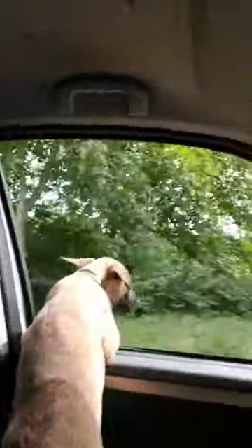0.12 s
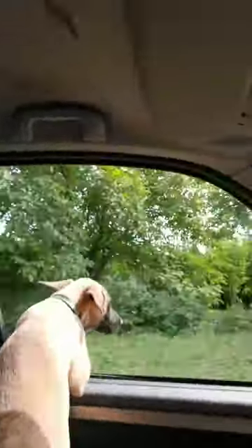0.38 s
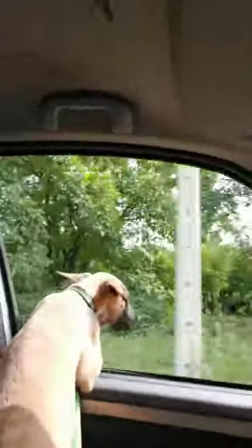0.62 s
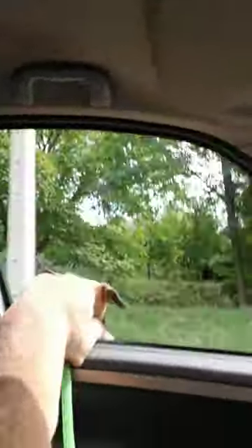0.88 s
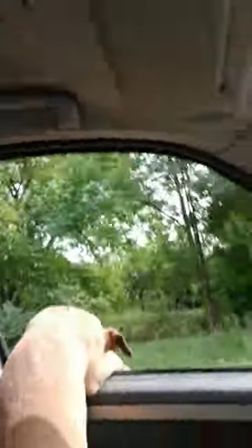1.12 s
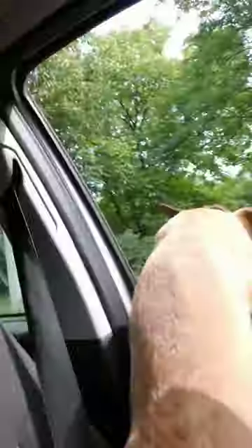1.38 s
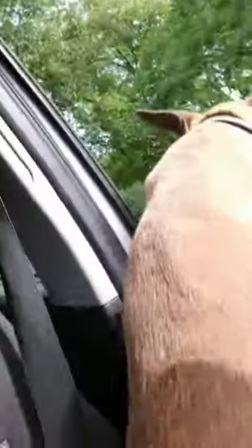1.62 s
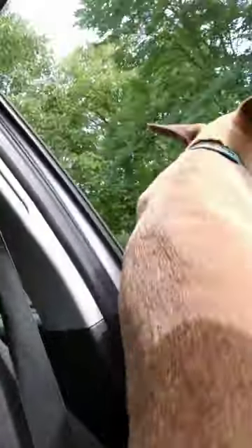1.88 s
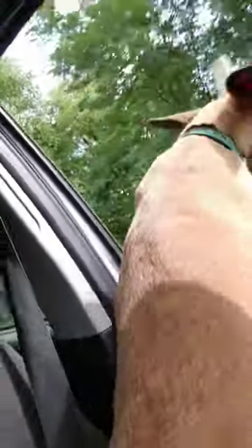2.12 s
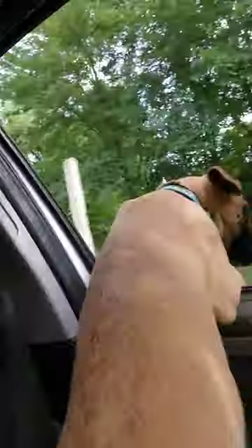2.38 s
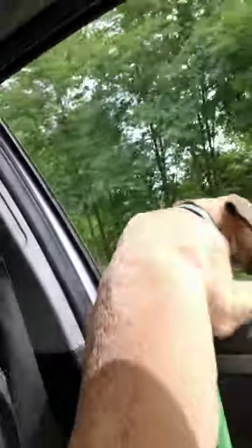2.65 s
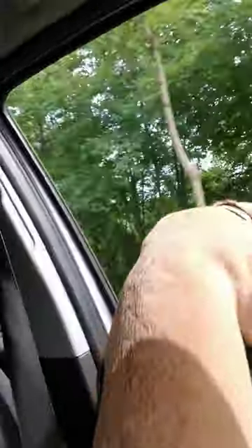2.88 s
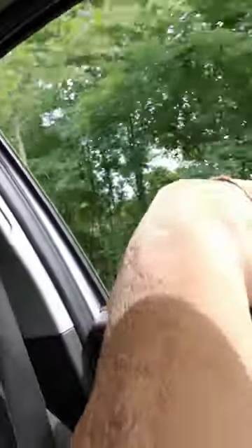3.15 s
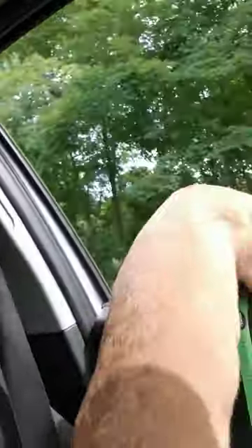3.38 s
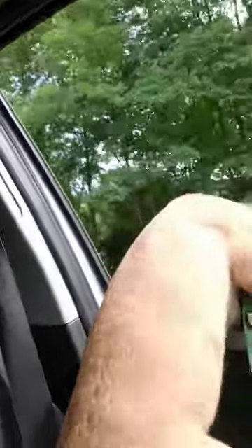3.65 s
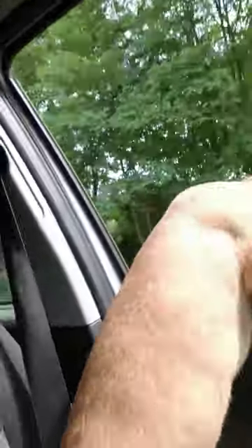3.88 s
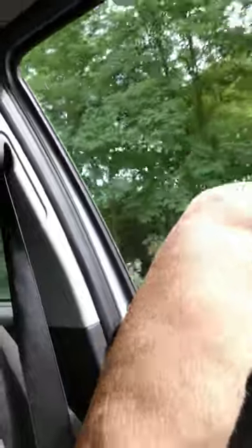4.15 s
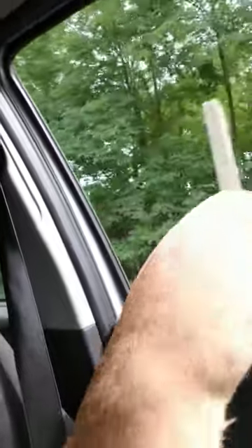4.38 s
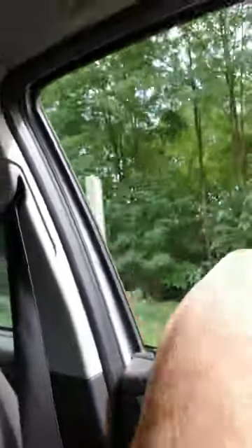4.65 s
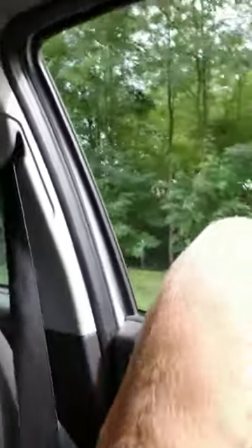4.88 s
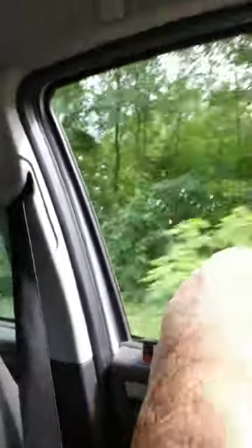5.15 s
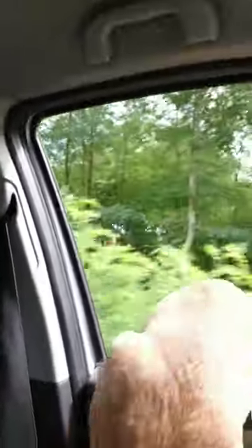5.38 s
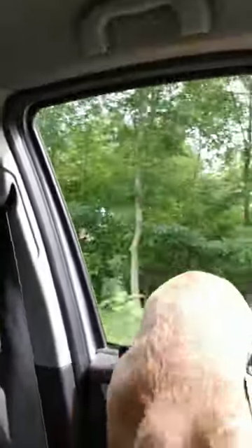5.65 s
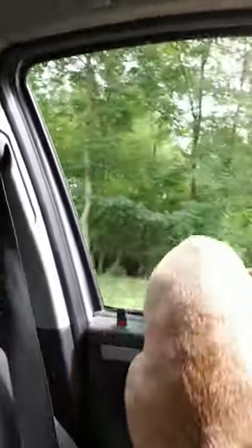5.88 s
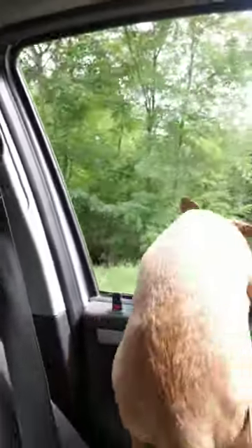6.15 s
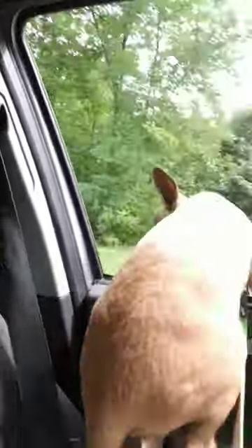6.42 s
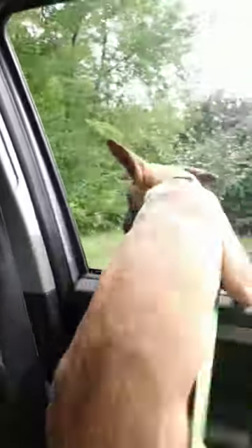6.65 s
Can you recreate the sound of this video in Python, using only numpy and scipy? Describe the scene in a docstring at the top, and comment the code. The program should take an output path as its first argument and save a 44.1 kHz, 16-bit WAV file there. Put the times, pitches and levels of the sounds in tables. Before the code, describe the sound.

A handheld microphone in a car cabin picks up continuous low rumble, uneven and shuddering, with faint window wind. The start is fairly plain, with small ticks and a soft rub; from about two seconds bumps cluster, and paws knock and scratch on plastic. A burst of coarse fur or cloth rubbing follows, then scattered clicks, a brief passing tyre swish and final knocks.

```python
"""Car on a rough road, window open

Inside a car on a rough country road with a side window open and a dog leaning out.
Resonant noise booms in the cabin, bumps heave and shudder; tyre roar and airflow come from the window.
To the right fur and cloth rub and shaken trim rattles dully, both as fluttering noise; paws, claws and
loose trim excite resonances as ticks and knocks. Two squeaks slide in pitch; late on, a vehicle swells past."""
import sys
import numpy as np
from scipy import signal
from scipy.fft import rfft, irfft, next_fast_len
from scipy.io import wavfile
from scipy.ndimage import uniform_filter1d, map_coordinates

SR = 44100
rng = np.random.default_rng(int(sys.argv[2]) if len(sys.argv) > 2 else 0)


def ratio(d):
    """dB to gain"""
    e = np.asarray(d, float) / 20
    return 10 ** e


def materialize(psi):
    """Save the field psi as 16-bit PCM at rate SR to the path in sys.argv[1].

    A 1-D psi becomes a single channel; in a 2-D psi each row is a channel.
    """
    bounded = np.clip(np.atleast_2d(psi).T, -1, 1)
    quanta = np.round(bounded * 32767).astype(np.int16)
    wavfile.write(sys.argv[1], SR, quanta)


N = 298998


def unit(x):
    """Scale to rms 1."""
    return x / np.sqrt(np.mean(x ** 2) + 1e-20)


def along(points, hz):
    """Interpolate (Hz, value) points on a log frequency axis."""
    f, v = np.transpose(points)
    return np.interp(np.log(hz + 1), np.log(f + 1), v)


def curves(rows):
    """One value per sample for each column after the time."""
    s, *cols = np.transpose(rows)
    return [np.interp(np.arange(N) / SR, s, c) for c in cols]


def wobble(knots_per_s):
    """Smooth random curve through random knots."""
    knots = rng.standard_normal(int(N * knots_per_s / SR) + 4)
    return map_coordinates(knots, [np.arange(N) * knots_per_s / SR])


def filtered(x, response):
    """Multiply the spectrum of x by a complex response of frequency."""
    m = next_fast_len(x.shape[-1] + 8192)
    spectrum = rfft(x, m) * response(np.fft.rfftfreq(m, 1 / SR))
    return irfft(spectrum, m)[..., :x.shape[-1]]


def resonances(modes):
    """Causal response of (Hz, width Hz, dB) resonances of alternating sign."""
    def response(f):
        return sum((-1) ** k * ratio(db) * 1j * f * w / (c * c - f * f + 1j * f * w)
                   for k, (c, w, db) in enumerate(modes))
    return response


def shape(spectrum):
    """Gain of a (Hz, dB) spectrum."""
    return lambda hz: ratio(along(spectrum, hz))


# sound shared by both microphones: (frequency [Hz], likeness [0..1])
LIKENESS = [(30, .998), (60, 0.99), (130, 0.99), (290, 0.82), (640, 0.84), (1400, 0.1), (4000, .35),
            (12000, .2)]


def ports(pair, balance, lead_s):
    """Two noises become two microphones: partly shared, tilted to one side, the left early by lead_s."""
    def share(hz):
        turn = np.arccos(np.clip(along(LIKENESS, hz), -1, 1)) / 2
        return np.array([np.cos(turn), np.sin(turn)])

    def tilt(hz):
        # below a few hundred Hz the cabin moves as one and the delay fades
        lag = np.pi * hz * lead_s * hz ** 2 / (hz ** 2 + 500 ** 2)
        gain = ratio(np.outer([0.5, -0.5], along(balance, hz)))
        return gain * np.exp(1j * np.outer([1, -1], lag))

    mid, side = filtered(pair, share)
    return filtered(np.array([mid + side, mid - side]), tilt)


def rush(colour, balance, lead_s, patchy_db):
    """Stereo noise, patchy in time and frequency, whose middle has rms 1."""
    z = signal.stft(rng.standard_normal((2, N)), nperseg=512)[2]
    field = uniform_filter1d(rng.standard_normal(z.shape[1:]), size=6, axis=0)
    field = uniform_filter1d(field, size=8, axis=1)
    pair = signal.istft(z * ratio(patchy_db * unit(field)), nperseg=512)[1][:, :N]
    out = ports(filtered(pair, colour), balance, lead_s)
    return out / np.sqrt(np.mean(out.mean(0) ** 2))


def place(events, lead_s):
    """Lay out stereo bursts (time s, pair, dB, left over right dB)."""
    out = np.zeros((2, N + SR))
    for s, pair, db, pan_db in events:
        both = ports(pair, [(100, pan_db)], lead_s)
        start = round(s * SR)
        out[:, start:start + both.shape[1]] += ratio(db) * both
    return out[:, :N]


# cabin air resonances: (centre [Hz], width [Hz], relative level [dB])
CABIN_MODES = [(23, 11.7, 0), (37.1, 17.7, 0.5), (67.5, 18.4, 0)]
# body drumming, tyre roar and airflow spectra: (frequency [Hz], relative density [dB])
DRUM_SPECTRUM = [(50, -34), (85, 0), (124, -7.5), (154, -6), (183, -15.5), (252, -19), (300, -26),
                 (390, -38.5), (660, -120)]
ROAR_SPECTRUM = [(180, -54), (300, -9), (356, -1), (397, -7), (471, -5.5), (973, -13.5), (1100, -11.5),
                 (1830, -23.5), (2300, -38), (2990, -57), (5060, -120)]
AIR_SPECTRUM = [(1180, -36.5), (2000, -21), (2980, 0), (4390, -23.5), (5050, -14), (5600, -63.5),
                (6710, -15.5), (7510, -30), (12200, -12.5), (15800, -16.5)]
# balance of sound from the window: (frequency [Hz], left over right [dB])
WINDOW_BALANCE = [(60, -1), (180, 0.5), (550, -0.5), (1650, -6), (4970, 10), (15000, 2.5)]
# road coarseness, heard as drumming: (time [s], mean level [dB])
SURFACE_LEVEL = [(0, -29), (1.0, -31), (1.5, -31), (2.2, -30.5), (2.75, -32), (3.1, -28.5), (3.85, -33.5),
                 (4.2, -29.5), (4.9, -33), (5.2, -30.5), (5.55, -33.5), (6.0, -30.5), (6.5, -27),
                 (6.78, -32)]
# tyre roar thrown back by the roadside through the window: (time [s], mean level [dB])
ROADSIDE_LEVEL = [(0, -51), (1.0, -48.5), (2.2, -53), (3.85, -51.5), (4.2, -50), (5.2, -49.5), (5.55, -53),
                  (6.78, -44.5)]


def road():
    """The road shakes the cabin air and drums the body; tyres roar and air streams past the window."""
    (drum_db,), (roar_db,) = curves(SURFACE_LEVEL), curves(ROADSIDE_LEVEL)
    boom_db, air_db = -26, -74
    modes = resonances(CABIN_MODES)
    boom = rush(lambda hz: modes(hz) / (1 + (hz / 92) ** 6), WINDOW_BALANCE, 0, patchy_db=1.0)
    shake = wobble(11)  # small unevenness reaches body and tyres together
    drum = rush(shape(DRUM_SPECTRUM), WINDOW_BALANCE, 0, patchy_db=1.5)
    roar = rush(shape(ROAR_SPECTRUM), WINDOW_BALANCE, 0.00051, patchy_db=2.14)
    air = rush(shape(AIR_SPECTRUM), WINDOW_BALANCE, 0.0006, patchy_db=1)
    drum = ratio(drum_db + 1.53 * shake) * drum
    roar = ratio(roar_db + 1.82 * shake) * roar
    return ratio(boom_db) * boom + drum + roar + ratio(air_db) * air


# body shudder spectrum: (frequency [Hz], relative density [dB])
SHUDDER_SPECTRUM = [(41, -19.5), (70, -2.5), (135, -7), (176, -5), (269, -19.5), (400, -25), (461, -21.5),
                    (669, -36), (1500, -41.5), (1950, -55), (3300, -120)]
# bumps: (time [s], length [s], heave level [dB], nominal heave pitch [Hz], shudder level [dB])
BUMP_EVENTS = [(.0, 0.07, -20.5, 34.5, -30), (1.87, 0.1266, -22.5, 60.5, -20),
               (2.044, 0.065, -22, 34, -40.5), (2.399, 0.055, -26.5, 39, -28.5),
               (2.488, 0.14, -17.5, 48.4, -23), (2.881, .11, -18.5, 44.9, -20),
               (3.029, 0.081, -32, 39.4, -31), (3.55, 0.14, -14.5, 52.9, -21.5),
               (4.011, 0.085, -25, 34, -39.5), (4.631, .1, -33.5, 49.2, -23.5),
               (5.25, 0.1767, -17.5, 39.8, -27.5), (6.238, 0.099, -29.5, 29.7, -23)]


def bumps():
    """A wheel meets a bump: the cabin air heaves at a sinking pitch while the body shudders in lumps."""
    out, t = [], np.arange(SR // 2) / SR
    for s, length_s, heave_db, heave_hz, shudder_db in BUMP_EVENTS:
        u = t / length_s
        swell = u ** 0.8 * np.exp(-(1.65 * u) ** 1.45)
        roll = u ** 1.62 * np.exp(-(1.34 * u) ** 1.76)  # the air peaks later than the metal
        noise = rng.standard_normal((3, len(t)))
        lumps = unit(uniform_filter1d(noise[2], size=600))
        pitch_hz = heave_hz * (1.4 - 0.662 * np.minimum(u, 1.4) + 0.24 * lumps)
        heave = roll * np.sin(2 * np.pi * (rng.random() + np.cumsum(pitch_hz) / SR))
        shudder = swell * ratio(2 * lumps) * filtered(noise[:2], shape(SHUDDER_SPECTRUM))
        pair = ratio(heave_db) * unit(heave) * [[1], [0]] + ratio(shudder_db) * unit(shudder)
        span = np.sqrt(t[-1] / length_s)  # levels count over the bump's length
        out.append((s, pair / span, 0, -0.7))
    return place(out, 0)


# scrape and fine fizz spectra: (frequency [Hz], relative density [dB])
SCRAPE_SPECTRUM = [(530, -18), (900, -2.5), (1070, -4.5), (1550, 4.5), (2700, -2), (3140, -0.5), (4080, 0),
                   (5730, -2.5), (8500, -19.5), (11000, -37.5), (18700, -120)]
FIZZ_SPECTRUM = [(5000, -15), (8500, -13.5), (10600, -8), (14500, -7), (15200, -6.5), (15800, -11)]
# balance of sound from the seat side: (frequency [Hz], left over right [dB])
SEAT_BALANCE = [(60, 0), (180, -1.5), (550, -17), (1650, -3), (4970, -5), (15000, -12)]
# fur and cloth strokes, and duller rattles of trim shaken by bumps:
# (time of full strength [s], hold [s], scrape level [dB], fizz over scrape [dB])
RUB_AND_RATTLE_EVENTS = [(0.916, .005, -70.5, 1), (1.049, 0.0033, -46.5, -6), (1.289, .005, -59.5, -4.5),
                         (1.436, 0.068, -63, -0.5), (1.624, .03, -54.5, -2.5), (1.737, .06, -76, 7.5),
                         (1.97, 0.065, -56.5, -12.5), (2.31, 0.08, -68, 0), (2.518, .04, -57.5, -8),
                         (2.57, 0.025, -53.5, -21), (2.943, 0.028, -54, -29), (3.598, 0.0069, -45.5, -29.5),
                         (3.654, 0.088, -53, -3.5), (3.773, 0.034, -57, -1), (3.857, 0.014, -52, 0),
                         (3.938, 0.037, -58, -9.5), (4.27, 0.054, -52, -6.5), (4.381, 0.046, -59, -4),
                         (4.51, .005, -51.5, -8), (4.653, 0.031, -38.5, 2), (4.728, 0.1, -38, 2),
                         (4.871, 0.15, -44.5, 1), (5.115, 0.065, -44, -0.5), (5.246, 0.078, -52.5, -1.5),
                         (5.352, 0.0038, -50.5, -10), (5.493, .005, -60.5, 0.5), (5.635, 0.004, -56, -11),
                         (5.837, 0.046, -54.5, -10.5), (6.124, 0.0045, -55, -20), (6.214, .005, -48.5, -16),
                         (6.393, 0.13, -56, -12.5), (6.714, 0.031, -53, -5.5)]


def rubs_and_rattles():
    """Strokes and rattles set in, hold and fade; scrape and fizz flutter together in clumps."""
    rise_db_per_s, fade_db_per_s = 389, 179  # rise of an event of -47.5 dB
    snatch = 0.53  # dB of faster rise per dB of strength: strong events start abruptly
    rest_scrape_db, rest_fizz_db = -66, -77  # faint rubbing that never stops
    s, hold_s, db, fizz_db = np.transpose(RUB_AND_RATTLE_EVENTS)[..., None]
    t = np.arange(0, N / SR, 1 / 1000)
    rise = rise_db_per_s * ratio(snatch * (db + 47.5)) * np.maximum(s - t, 0)
    fade = fade_db_per_s * np.maximum(t - s - hold_s, 0)
    level_db = db - rise - fade

    def total(rest_db, event_db):
        power = ratio(rest_db) ** 2 + np.sum(ratio(event_db) ** 2, 0)
        return np.interp(np.arange(N) / SR, t, np.sqrt(power))

    flutter_db = 0.99 * wobble(30) + 1.15 * wobble(150)
    scrape = rush(shape(SCRAPE_SPECTRUM), SEAT_BALANCE, -0.000466, patchy_db=2.5)
    fizz = rush(shape(FIZZ_SPECTRUM), SEAT_BALANCE, -0.00024, patchy_db=1.1)
    scrape = total(rest_scrape_db, level_db) * scrape
    fizz = total(rest_fizz_db, level_db + fizz_db) * fizz
    return ratio(flutter_db) * (scrape + fizz)


def contact(modes, centre_hz, spread_db_per_octave, length_s, t60_s):
    """A sharp touch, friction for length_s, then decay; modes near centre_hz ring most."""
    t = np.arange(SR // 5) / SR
    late = np.maximum(t - length_s, 0)
    fall = ratio(-60 * late / t60_s) + ratio(-15.0 - 60 * late / 0.32)  # fast decay over a weaker slow one
    struck = [(hz, w, db - spread_db_per_octave * abs(np.log2(hz / centre_hz))) for hz, w, db in modes]
    ring = resonances(struck)
    grit = ratio(4 * np.repeat(rng.standard_normal(len(t) // 60), 60))  # surfaces catch in tiny jerks
    noise = unit(grit * rng.standard_normal((2, len(t))))
    gain = np.sqrt(np.mean(filtered(noise, ring) ** 2))
    touch = 9 * np.sign(noise) * (t == 0)
    return filtered(fall * noise + touch, ring) / gain, fall


# plastic trim resonances: (centre [Hz], width [Hz], relative level [dB])
TRIM_MODES = [(2310, 690, 3.5), (3720, 990, -3), (4700, 500, 2.5), (5900, 1550, -7), (7220, 610, -4.5)]
# sharp edge of a tick: (frequency [Hz], relative density [dB])
EDGE_SPECTRUM = [(8000, -120), (9000, -4.5), (12000, -3), (15800, -5)]
# ticks: (time [s], nominal peak level [dB], centre [Hz], contact length [s], left over right [dB])
TICK_EVENTS = [(1.2364, -34.5, 5900, 0.0039, -6), (1.283, -43, 3300, 0.008, 1),
               (1.56, -39.5, 5200, 0.0023, -13), (1.928, -36, 4300, 0.013, -11),
               (1.9814, -39.5, 4700, 0.01, -10), (2.018, -38.5, 2750, 0.0024, -7),
               (2.43, -44.5, 3820, 0.0025, -8.5), (2.502, -38, 4300, 0.0076, -9.5),
               (2.926, -42.5, 4250, 0.0074, -11.5), (2.962, -28, 4900, 0.0059, -10),
               (3.003, -37, 4900, 0.0071, -10), (3.43, -48, 4140, 0.0082, -5),
               (3.465, -40, 3150, 0.0058, -3), (3.5783, -36.5, 4660, 0.005, -11.5),
               (3.6183, -26.5, 4700, 0.0093, -6.5), (3.959, -44.5, 2960, 0.029, 3.5),
               (4.4437, -37, 3800, 0.041, 1.5), (5.562, -48, 4400, .004, -7),
               (5.5907, -46, 6000, 0.0048, 5.5), (5.6043, -32.5, 6760, 0.0061, -5),
               (5.7768, -32, 4080, 0.0046, -6), (5.8045, -32.5, 3760, 0.016, 1),
               (5.8096, -36.5, 4150, 0.0044, -12), (5.947, -39, 5900, 0.0068, -3),
               (6.184, -40, 2650, 0.0056, 2), (6.223, -42, 3260, 0.0065, 10),
               (6.545, -44.5, 3500, 0.006, -5), (6.6864, -27.5, 2920, 0.0031, -2.5),
               (6.739, -34.5, 3620, 0.017, 0)]


def ticks():
    """Claws and loose trim tick: a short ring of the plastic and a sharp edge above it."""
    edge_db, edge_db_per_octave = -12.5, 15.5  # at a 4.4 kHz centre; higher ticks have more edge
    bursts = []
    for s, db, hz, length_s, pan_db in TICK_EVENTS:
        ring, fall = contact(TRIM_MODES, hz, 10.6, length_s, t60_s=0.043)
        edge = fall * unit(filtered(rng.standard_normal(ring.shape), shape(EDGE_SPECTRUM)))
        edge = ratio(edge_db + edge_db_per_octave * np.log2(hz / 4400)) * edge
        # the body of a noisy burst lies below its peak
        bursts.append((s, ring + edge, db - 9.0, pan_db))
    return place(bursts, -0.000297)


# door panel resonances: (centre [Hz], width [Hz], relative level [dB])
DOOR_MODES = [(436, 65, 10), (635, 123, 6), (891, 83, 2.5), (1057, 79, 4), (1320, 240, -1.5),
              (1730, 140, 4.5), (2165, 90, -1.5)]
# knocks: (time [s], level [dB], centre [Hz], contact length [s])
KNOCK_EVENTS = [(1.56, -42, 1330, 0.0013), (1.596, -45, 594, .01), (1.883, -42, 560, 0.0083),
                (2.423, -55, 590, 0.0025), (2.458, -48, 600, .006), (2.888, -38.5, 506, 0.0051),
                (2.91, -41, 473, .012), (2.948, -46, 557, 0.009), (3.464, -29, 926, 0.0064),
                (3.521, -44.5, 1110, 0.0058), (3.557, -44.5, 895, 0.03), (3.765, -41, 1100, 0.0051),
                (3.956, -48.5, 1050, 0.041), (4.222, -47, 590, 0.052), (4.372, -44, 740, 0.032),
                (4.439, -39, 1470, 0.039), (4.613, -34.5, 960, 0.0041), (4.858, -45, 580, 0.079),
                (5.141, -41.5, 714, 0.019), (5.589, -41, 820, 0.029), (5.776, -44.5, 1560, 0.0096),
                (5.803, -35, 1230, 0.018), (5.894, -36, 696, 0.0068), (6.541, -30.5, 390, 0.0078),
                (6.69, -38.5, 860, .006), (6.731, -36.5, 950, 0.0097)]


def knocks():
    """Paws knock and drag on the hollow door panel, ringing its modes."""
    bursts = []
    for s, db, hz, length_s in KNOCK_EVENTS:
        ring, _ = contact(DOOR_MODES, hz, 11, length_s, t60_s=0.039)
        bursts.append((s, ring, db, -2))
    return place(bursts, -0.00031)


# squeaks: (time [s], length [s], level [dB], start pitch [Hz], end pitch [Hz])
SQUEAK_EVENTS = [(2.283, .07, -62, 7800, 7200), (4.515, .016, -40, 2050, 2250)]


def squeaks():
    """Something slips on a smooth surface and sings briefly at a sliding, slightly unsteady pitch."""
    out = []
    for s, length_s, db, start_hz, end_hz in SQUEAK_EVENTS:
        u = np.clip(np.arange(SR // 10) / SR / length_s, 0, 1)
        unsteady = unit(uniform_filter1d(rng.standard_normal(len(u)), size=200))
        pitch_hz = (start_hz + (end_hz - start_hz) * u) * (1 + 0.01 * unsteady)
        swell = np.sqrt(np.sin(np.pi * u).clip(0))
        tone = swell * np.sin(2 * np.pi * np.cumsum(pitch_hz) / SR)
        out.append((s, tone * [[1], [0]], db, -4))
    return place(out, -0.0003)


# bands of a passing vehicle's tyre noise: (centre [Hz], width [Hz], relative level [dB], applied twice)
PASSING_MODES = [(1240, 68, 3.5), (1528, 110, 0), (1890, 230, -1.5)]


def passing():
    """Tyre noise swells briefly as another vehicle comes close, then drops away faster."""
    loudest_s, level_db = 6.47, -49.5
    swell_s, fade_s = 0.16, 0.12  # from half amplitude to the peak and back
    late = np.arange(N) / SR - loudest_s
    near = 1 / (1 + (late / np.where(late < 0, swell_s, fade_s)) ** 2)
    modes = resonances(PASSING_MODES)
    return near * ratio(level_db) * rush(lambda hz: modes(hz) ** 2, WINDOW_BALANCE, 0.0006, patchy_db=1)


def scene():
    """Everything heard in the cabin."""
    return road() + bumps() + rubs_and_rattles() + ticks() + knocks() + squeaks() + passing()


def top_cut(x):
    """Nothing passes above the cut-off."""
    return signal.sosfilt(signal.butter(12, 16490, fs=SR, output="sos"), x)


def record(dry):
    """The microphone drops the deepest bass and the top and rounds off the biggest jolts."""
    low_hz, top_hz, ceiling = 14, 15650, 0.6
    band = filtered(dry, lambda hz: (hz < top_hz) * hz ** 2 / (hz ** 2 + low_hz ** 2))
    soft = band / (1 + np.abs(band / ceiling) ** 3) ** (1 / 3)
    return top_cut(soft)


dry = scene()
out = record(dry)
materialize(out)
```